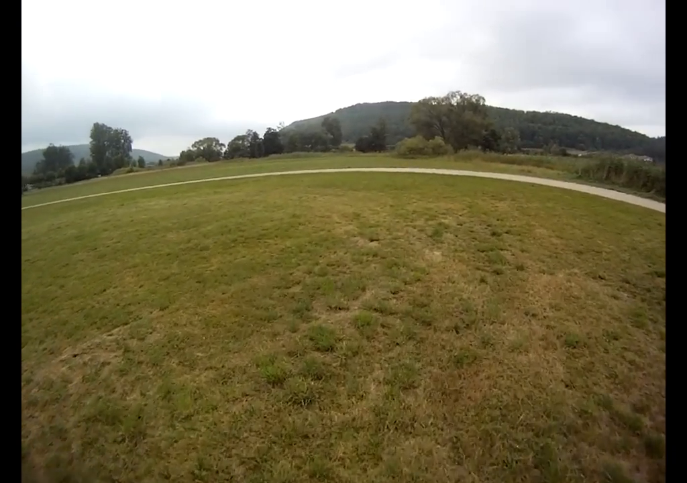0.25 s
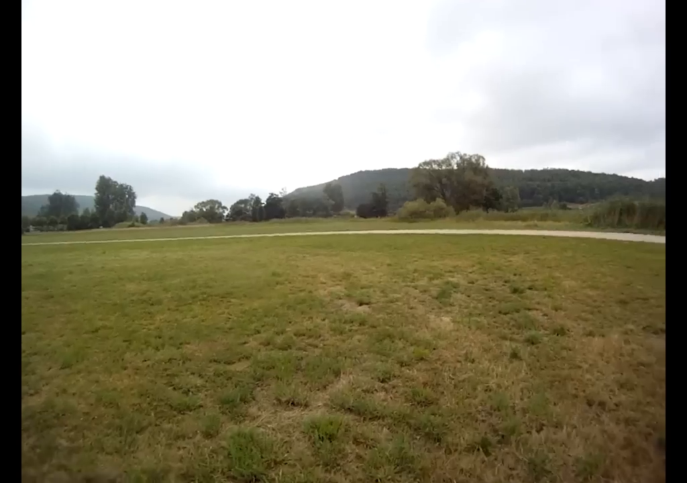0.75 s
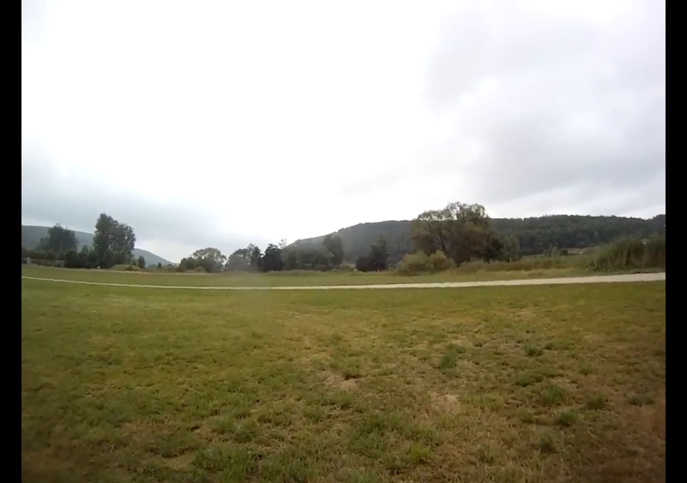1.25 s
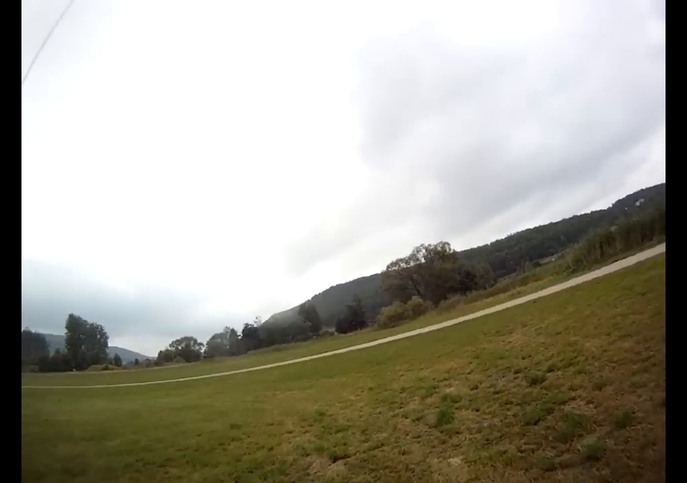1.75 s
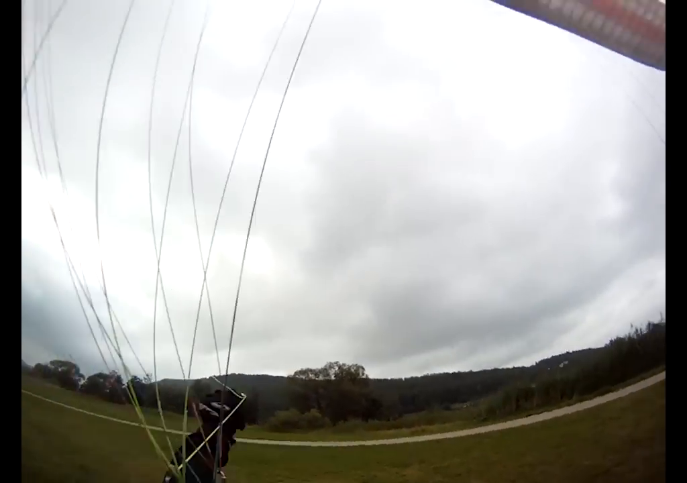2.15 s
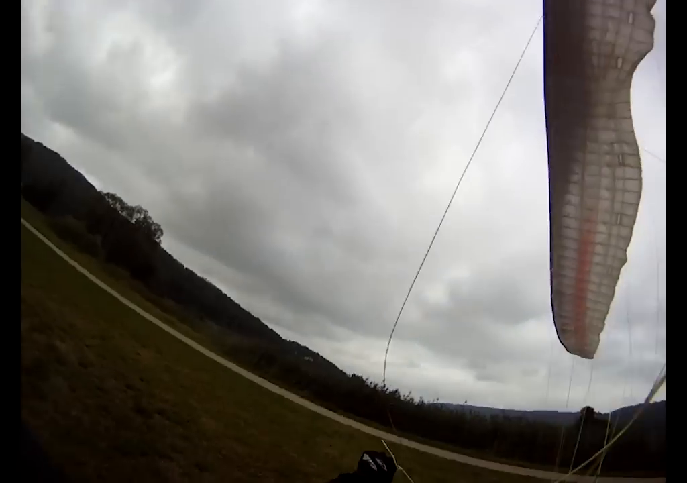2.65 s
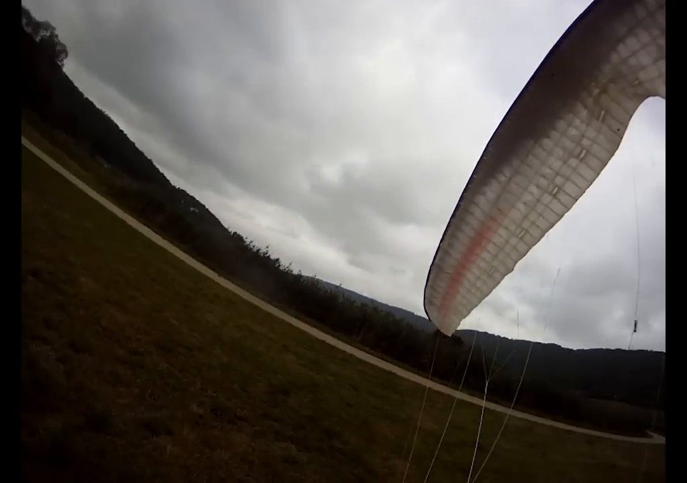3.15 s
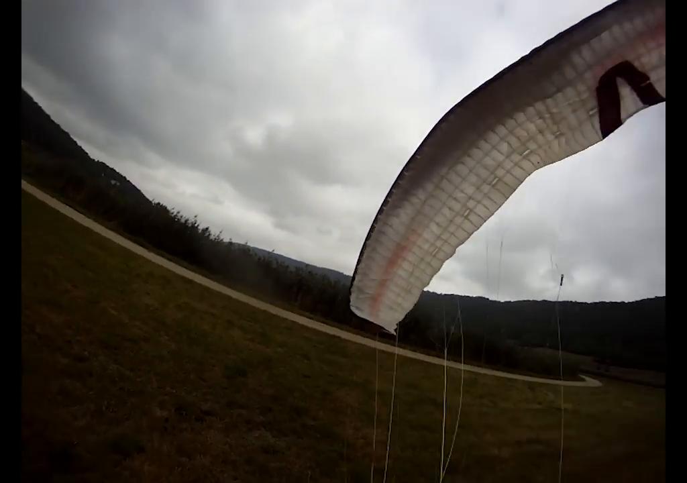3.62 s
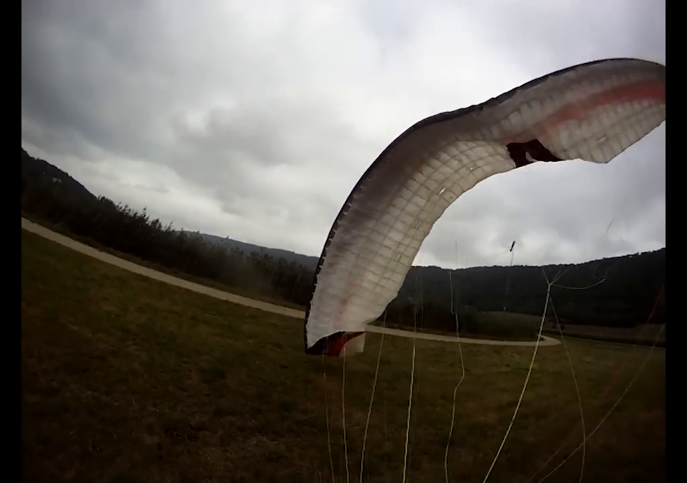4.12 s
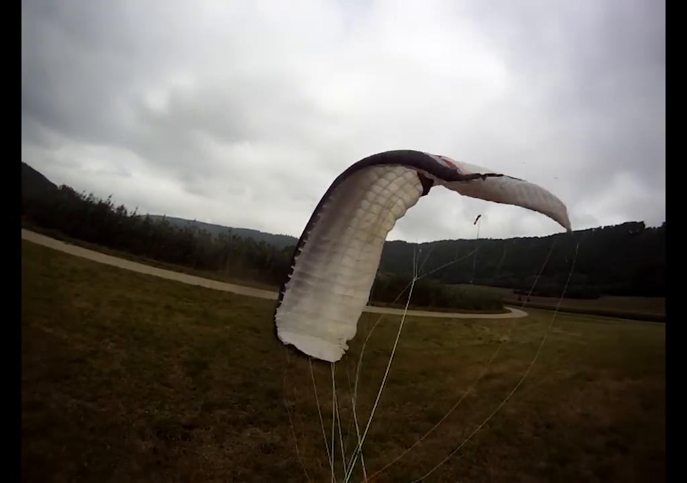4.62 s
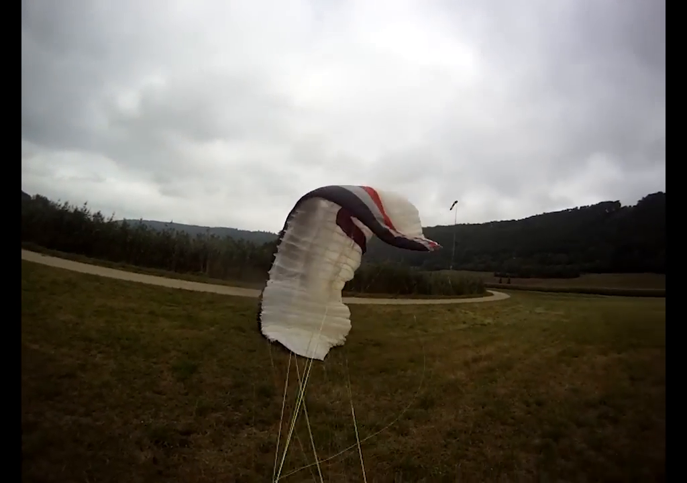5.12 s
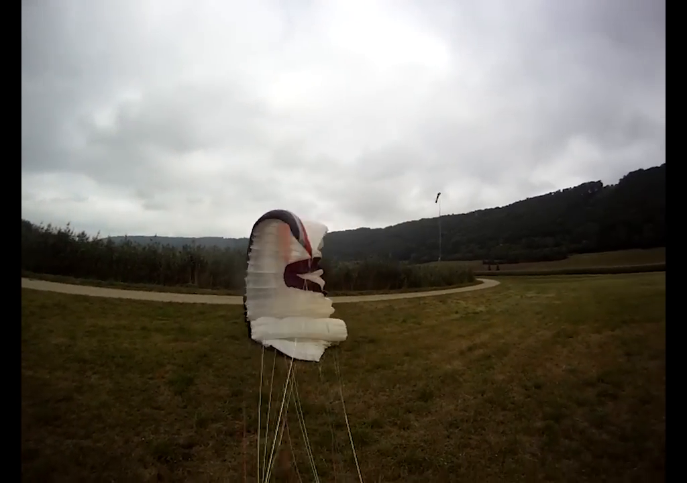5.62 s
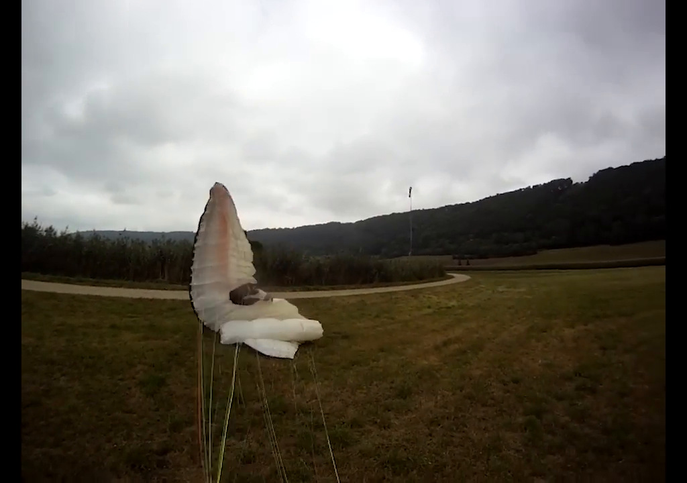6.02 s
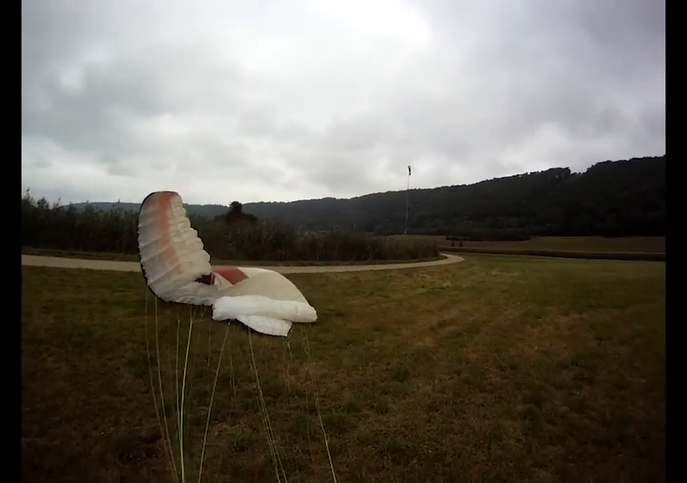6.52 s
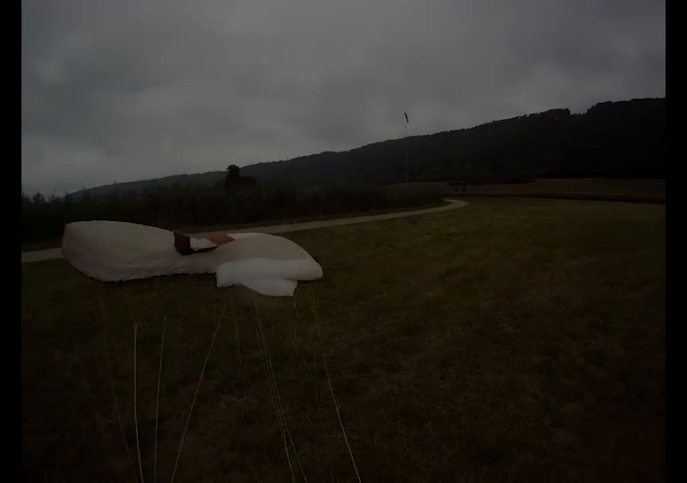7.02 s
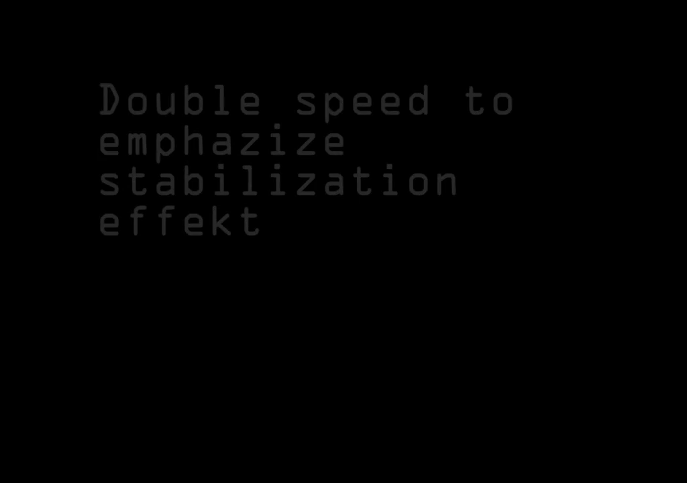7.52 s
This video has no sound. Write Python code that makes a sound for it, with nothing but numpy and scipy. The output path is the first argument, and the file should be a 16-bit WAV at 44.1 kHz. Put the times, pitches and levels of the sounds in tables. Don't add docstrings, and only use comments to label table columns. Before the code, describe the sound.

On an open field, a helmet microphone catches strong low wind buffeting. A very loud cluster of harness thumps and plastic buckle knocks hits, and the wind drops. A braided cord is then hauled through a metal ring, buzzing and zipping up and down in pitch. It slackens to faint scratches; stiff fabric rustles, with a last scratchy drag before sudden silence.

```python
import sys
import numpy as np
from scipy import signal
from scipy.fft import rfft, irfft, next_fast_len
from scipy.io import wavfile
from scipy.ndimage import uniform_filter1d, map_coordinates

SR = 44100
rng = np.random.default_rng(int(sys.argv[2]) if len(sys.argv) > 2 else 0)


def waveform_to_disk(signal):
    frames = np.transpose(np.atleast_2d(signal))
    scaled = np.clip(frames, -1, 1) * 32767
    samples = np.round(scaled).astype(np.int16)
    wavfile.write(sys.argv[1], SR, samples)


def undo_db(level):
    steps = np.asarray(level, float) / 20
    return 10 ** steps


N = 342416
TIME = np.arange(N) / SR
SPARSE = TIME[::16]
HOLD_HZ = 12000


def unit(x):
    return x / np.sqrt(np.mean(x ** 2) + 1e-20)


def curves(rows):
    s, *cols = np.transpose(rows)
    return [np.interp(TIME, s, c) for c in cols]


def wobble(rate):
    coarse = np.arange(N // 16 + 2) * 16 / SR
    knots = rng.standard_normal(int(N * rate / SR) + 4)
    return np.interp(TIME, coarse, map_coordinates(knots, [coarse * rate]))


def swells(rows):
    bells = sum(height * np.exp(-((SPARSE - s) / half) ** 2) for s, height, half in rows)
    return np.interp(TIME, SPARSE, bells)


def filtered(x, response):
    m = next_fast_len(N + SR // 2)
    return irfft(rfft(x, m) * response(np.fft.rfftfreq(m, 1 / SR)), m)[..., :N]


def colour(spectrum):
    def response(hz):
        f, db = np.transpose(spectrum)
        gain_db = np.interp(np.log(hz + 1), np.log(f), db)
        cepstrum = irfft(np.log(undo_db(gain_db) + 1e-5))
        cepstrum[1:len(hz) - 1] *= 2
        cepstrum[len(hz):] = 0
        return np.exp(rfft(cepstrum))
    return response


def resonances(modes):
    return lambda f: sum(undo_db(db) * 1j * f * w / (c * c - f * f + 1j * f * w) for c, w, db in modes)


def noise(spectrum, patchy_db):
    z = signal.stft(rng.standard_normal(N + 512), nperseg=512)[2]
    field = uniform_filter1d(rng.standard_normal(z.shape), size=5, axis=0)
    field = unit(uniform_filter1d(field, size=6, axis=1))
    patchy = signal.istft(z * undo_db(patchy_db * field), nperseg=512)[1][:N]
    return unit(filtered(patchy, colour(spectrum)))


# pitch_hz, level_db (per Hz)
BUFFET_COLOUR = [(12, -18), (20, -1), (49, -1), (76, 0), (95, -2.5), (120, -36), (210, -120)]
# pitch_hz, level_db (per Hz)
FLUTTER_COLOUR = [(53, -31.5), (90, 1.5), (113, -0.5), (200, -7.5), (260, -24), (440, -120)]
# pitch_hz, level_db (per Hz)
RUSH_COLOUR = [(120, -28.5), (200, -3.5), (318, -2), (390, -4), (513, -2), (759, -16.5), (1000, -27.5),
               (1300, -25.5), (2200, -120)]
# time_s, strength_db
AIRFLOW = [(0, -37), (.14, -33), (.53, -29.5), (.79, -29), (.88, -41), (1.26, -38.5), (1.4, -45.5),
           (2.2, -42), (2.9, -46.5), (3.4, -44.5), (4.2, -46.5), (4.7, -47.5), (5.4, -45.5), (6.4, -47.5),
           (7.4, -48.5)]
# middle_s, swell_db, half_length_s, rush_share (part of the swell heard in the rush)
GUSTS = [(0.067, 14, 0.29, 0.042), (0.785, 5, 0.037, 2.1), (0.834, 1.5, 0.16, 1.1),
         (1.106, 3.5, 0.72, 1.76), (1.485, 4.5, 0.072, 1.5), (2.157, 4.5, 0.17, 0.98),
         (2.47, 4, 0.053, 0.75), (2.653, 4, 0.077, 0.53), (2.831, 0.5, 0.045, 1.6), (3.38, 3, 0.048, 2.16),
         (3.597, 3.5, 0.16, 0.82), (4.371, 0.5, 0.11, 1.24), (4.597, 6, 0.22, 1.46), (4.68, 3, 0.59, 0.76),
         (4.753, 6, 0.06, 0.29), (4.913, 8, 0.043, 1.3), (5.063, 7, 0.059, 0.6), (5.178, 3, 0.19, 1.4),
         (5.744, 1, 0.69, 0.74), (6.078, 7.5, 0.14, 0.35), (6.541, 2.5, 0.068, .1),
         (6.911, 5.5, 0.11, 0.19), (7.237, 5.5, .12, 1)]
CALM_DB, FLUTTER_DB, RUSH_DB = -44, -51.5, -50.5
FLUTTER_FOLLOWS, RUSH_FOLLOWS, BUFFET_SWELLS = 0.33, 0.31, 0.16


def wind():
    air_db, = curves(AIRFLOW)
    gust_db = swells([row[:3] for row in GUSTS])
    rush_gust_db = swells([(s, db * share, half) for s, db, half, share in GUSTS])
    buffet_db = air_db + BUFFET_SWELLS * gust_db
    flutter_db = FLUTTER_DB + FLUTTER_FOLLOWS * (air_db - CALM_DB) + gust_db
    rush_db = RUSH_DB + RUSH_FOLLOWS * (air_db - CALM_DB) + rush_gust_db
    lumps = wobble(4.6)
    buffet = unit(undo_db(0.5 * lumps) * noise(BUFFET_COLOUR, patchy_db=1))
    rush = unit(undo_db(0.5 * lumps + 0.69 * wobble(25)) * noise(RUSH_COLOUR, patchy_db=2.5))
    flutter = noise(FLUTTER_COLOUR, patchy_db=2.0)
    return undo_db(buffet_db) * buffet + undo_db(flutter_db) * flutter + undo_db(rush_db) * rush


# time_s, level_db
FABRIC = [(0, -57), (.36, -55), (.58, -47), (1.1, -50), (1.3, -46.5), (1.53, -50), (2.6, -50.5),
          (2.7, -55.5), (2.78, -48), (4.25, -48.5), (4.4, -45), (4.9, -40), (5.2, -44.5), (5.44, -50),
          (5.93, -48), (6.5, -54), (7.41, -53), (7.455, -48.5)]
# pitch_hz, level_db (per Hz)
CLOTH_COLOUR = [(350, -27.5), (600, 0), (815, -7), (977, -4.5), (1070, -6), (1790, -8.5), (2180, -4.5),
                (3020, -4), (3620, -13.5), (4830, -12.5), (5620, -21.5), (5900, -15), (7670, -54),
                (13000, -120)]
# middle_s, swell_db
FLAPS = [(.265, 1.5), (.88, 2.5), (1.075, -2), (4.78, 0), (4.82, -8), (4.955, -2), (5.01, -4.5), (5.052, 4),
         (5.25, 2), (5.31, 2), (5.77, 0.5), (5.93, 2.5), (7.327, 4.5)]
FLAP_S = 0.013
BIGGEST_CREASE_DB = 6


def fabric():
    level_db, = curves(FABRIC)
    level_db = level_db + swells([(s, db, FLAP_S) for s, db in FLAPS])
    creases = rng.random(N) < 700 * undo_db(5 * wobble(18)) / SR
    crease_db = np.minimum(2.2 * rng.exponential(size=N), BIGGEST_CREASE_DB)
    grains = creases * np.clip(rng.standard_normal(N), -2, 2) * undo_db(crease_db)
    crackle = unit(filtered(grains, colour(CLOTH_COLOUR)))
    hiss_db = 0.7 * wobble(23) + 0.75 * wobble(45)
    hiss = unit(undo_db(hiss_db) * noise(CLOTH_COLOUR, patchy_db=1.6))
    return undo_db(level_db + 1.0) * (hiss + undo_db(-8.0) * crackle)


# middle_s, level_db, pitch_hz, length_s
RUBS = [
    (0.253, -47.5, 2700, 0.016),
    (0.286, -44.5, 2740, 0.029),
    (0.349, -50, 2570, 0.077),
    (0.424, -48, 2130, 0.035),
    (0.54, -51, 2840, 0.023),
    (0.729, -37.5, 2400, 0.067),
    (1.062, -40.5, 2100, 0.059),
    (1.065, -48.5, 3280, 0.086),
    (1.46, -49, 5370, 0.03),
    (5.948, -48, 2590, 0.055),
]


def rubs():
    out = np.zeros(N)
    t = TIME[:SR // 5] - 0.1
    for s, db, hz, length in RUBS:
        stroke = signal.lfilter(*signal.iirpeak(hz, 6.5, fs=SR), rng.standard_normal(len(t)))
        swell = np.exp(-(2 * t / length) ** 4)
        out[round((s + t[0]) * SR):][:len(t)] += undo_db(db) * unit(stroke) * swell
    return out


# pitch_hz, width_hz, level_db
RING = [(595, 56, -2), (1090, 191, 3), (1483, 330, -11.5), (2110, 248, 4), (2480, 80, 1), (2700, 100, -2.5),
        (3007, 84, -3.5), (3140, 77, -25.5), (3720, 38, -15.5), (4165, 75, -6.5), (4910, 150, -8),
        (5800, 440, -27)]


def blips(events, cycles, crack):
    out, cracks = np.zeros(N + SR), np.zeros(N + SR)
    t = TIME[:SR // 10]
    for s, db, hz in events:
        start = round(s * SR)
        ring = np.sin(2 * np.pi * hz * t) * np.exp(-t * hz / cycles) * (1 - np.exp(-t * hz / 0.6))
        snap = rng.standard_normal(len(t)) * np.exp(-t / 0.0026) * (1 - np.exp(-t / 0.00063))
        out[start:][:len(t)] += undo_db(db) * ring
        cracks[start:][:len(t)] += undo_db(db) * crack * snap
    return out[:N] + filtered(cracks[:N], resonances(RING))


# start_s, peak_db, pitch_hz
THUMPS = [(0.56, -49, 140), (0.6185, -18, 449.5), (0.622, -23.5, 178), (0.63, -20, 381), (0.655, -20, 140),
          (0.686, -7, 349), (0.756, -25, 102.3), (0.786, -9.5, 96.2), (0.794, -19.5, 194.4),
          (0.783, -15.5, 328), (0.79, -16.5, 420), (0.814, -35, 102.3), (1.427, -18.5, 369),
          (1.547, -30.5, 601), (4.896, -23, 107)]


def harness_bumps():
    return blips(THUMPS, cycles=0.69, crack=0.069)


TICK_CYCLES = 3
# start_s, peak_db, pitch_hz
TICKS = [(0.799, -27.5, 2130), (0.817, -39, 830), (0.829, -29, 2060), (0.84, -34, 2160), (0.881, -25, 2130),
         (0.946, -39, 2300), (0.993, -24, 2150), (1.262, -33.5, 2050), (1.276, -27, 1100),
         (1.277, -24.5, 2070), (1.303, -23.5, 2080), (1.31, -23, 1030), (1.314, -23.5, 640),
         (1.545, -34, 2170), (1.547, -26, 660), (3.669, -37.5, 2019), (4.417, -28.5, 2150),
         (4.8157, -20.5, 2870), (4.818, -25, 2800), (4.84, -44, 2110), (4.899, -32, 870),
         (4.994, -26, 2228), (6.579, -27, 2150), (6.779, -39, 3100), (6.927, -28, 3524), (7.098, -26, 2902),
         (7.129, -27, 2230)]


def ticks():
    return blips(TICKS, cycles=TICK_CYCLES, crack=1.1)


# start_s, peak_db, pitch_hz
CATCHES = [(0.6165, -15, 525), (0.6485, -9.5, 900), (0.651, -13.5, 600), (0.6995, -13.5, 522),
           (3.846, -27, 3200), (3.846, -35, 1154), (3.92, -31, 4995), (4.021, -24, 4300),
           (4.0841, -26, 2193), (4.1265, -28, 3146), (4.1934, -27, 2080), (4.212, -32, 4940),
           (4.59, -26, 3600), (4.605, -29, 2290), (4.7398, -31, 3060), (4.7663, -28, 2540),
           (4.8401, -32, 2700), (4.8725, -44, 894), (5.0421, -30, 2190), (6.582, -27, 1147),
           (6.722, -24, 3100), (6.768, -31, 3000), (6.777, -26, 2900), (6.8056, -25, 2199),
           (6.9683, -24, 2250), (7.0431, -28, 2050), (7.134, -29, 1150), (7.135, -24, 2916),
           (7.178, -26, 2602), (7.2162, -28, 2713), (7.2411, -26, 2028)]


def snags():
    return blips(CATCHES, cycles=TICK_CYCLES, crack=0.6)


# start_s, peak_db, t60_s, corner_hz (hardness)
KNOCKS = [(0.598, -15, 0.012, 1800), (0.6122, 2, 0.02, 1300), (0.6149, -2.5, 0.011, 3990),
          (0.63, -17.5, 0.029, 1500), (0.6419, -6, 0.011, 1000), (0.642, 5.5, 0.0078, 1804),
          (0.6438, 2.5, 0.009, 9000), (0.6479, 2, 0.012, 2804), (0.6777, -15, 0.012, 3960),
          (0.6832, -9.5, 0.016, 3000), (0.6944, -9.5, 0.0068, 797), (0.6977, 10, 0.0085, 2620),
          (0.7229, -11.5, 0.015, 2000)]
# pitch_hz, width_hz, level_db
CASE = [
    (620, 380, -1),
    (1000, 510, 5.5),
    (1350, 510, -15),
    (2100, 550, 0),
    (3200, 700, -4.5),
    (4700, 600, -27),
]


def buckle():
    blows = np.zeros(N + SR)
    t = TIME[:SR // 20]
    for s, db, t60, hz in KNOCKS:
        blow = 0.59 * rng.standard_normal(len(t)) * undo_db(-60 * t / t60) * (1 - np.exp(-t / 0.0011))
        blow[:8] -= 0.5 * np.hanning(8)
        soft = np.exp(-2 * np.pi * hz / SR)
        dulled = signal.lfilter([(1 - soft) ** 2], np.poly([soft, soft]), blow)
        blows[round(s * SR):][:len(t)] += undo_db(db + 11.0) * dulled
    return filtered(blows[:N], resonances(CASE))


# time_s, ridge_rate_hz, tilt_db (of the flick, per overtone), twin_db (bump between ridges)
HAULS = [
    [(1.548, 298.4, -13.5, 21.5), (1.645, 374.3, -8.5, -2), (1.715, 503, 3.5, -8), (1.745, 507.6, 2.5, 0),
     (1.82, 696, 3, 7.5), (1.85, 702, 3.5, -7)],
    [(1.87, 795, 5, 8), (1.89, 826.6, 4, 11.5), (2.013, 844.4, 3.5, 3), (2.118, 957.5, 1, 2.5),
     (2.205, 955, -0.3, -2.5), (2.244, 722, 2, 0), (2.29, 689, -7.5, 5), (2.325, 553.7, 1, 7)],
    [(2.353, 540.3, -6, 6.5), (2.42, 430, -0.5, 4), (2.49, 380, 2, 0.5), (2.565, 331, 1, 2),
     (2.678, 301.8, 12, .3)],
    [(2.825, 314.4, 10, -10.5), (2.926, 333.6, 11, 0), (3.04, 369.2, 2.5, -2), (3.098, 525, -3, -1.5),
     (3.185, 424, 5.5, -3), (3.27, 478.5, 1.5, -7), (3.325, 455.2, 0, -11), (3.372, 400, 1, -7)],
    [(3.42, 454.2, -2.5, -12), (3.485, 383.4, 2.5, -4), (3.555, 389, -0.5, -12), (3.575, 305, 1, 10),
     (3.64, 296.5, 6.5, 6), (3.75, 341, 0.5, -6)],
]
# middle_s, top_rate_hz, half_length_s
JERKS = [(1.694, 611.6, 0.027), (1.734, 537, 0.011), (1.78, 888.5, 0.041), (1.834, 721, 0.011),
         (1.914, 846, .014), (1.967, 1011, 0.032), (2.073, 1212, 0.044), (2.13, 986, 0.01),
         (2.177, 1007, 0.013), (2.38, 642, 0.031), (2.522, 489.7, 0.033), (2.897, 388.5, .025),
         (2.951, 424.6, .022), (2.982, 501.6, 0.038), (3.075, 602.2, .03), (3.128, 691, .048),
         (3.21, 600.5, .028), (3.254, 539, .018), (3.299, 522.5, 0.024), (3.344, 521.3, .022),
         (3.398, 500.8, .025), (3.534, 488.3, 0.026), (3.702, 435.5, 0.042)]
ROUND_TOP = 1.5
LOUDER_DB_PER_OCTAVE, MIDDLE_HZ = 7, 630
SLIP_DB_PER_OCTAVE = 5


def speed():
    pull, tilt_db, twin_db = curves(np.concatenate(HAULS))
    arches = []
    for s, hz, half in JERKS:
        arch = np.clip(1 - np.abs((SPARSE - s) / half) ** ROUND_TOP, 0, 1)
        arches.append((hz - pull[round(s * SR)]) * arch)
    slips = np.interp(TIME, SPARSE, np.max(arches, axis=0))
    tugged = np.exp(uniform_filter1d(np.log(pull + slips), size=220))
    effort_db = LOUDER_DB_PER_OCTAVE * np.log2(pull / MIDDLE_HZ)
    effort_db = effort_db + SLIP_DB_PER_OCTAVE * np.log2(tugged / pull)
    return tugged, effort_db, [-tilt_db, twin_db, tilt_db]


# start_s, end_s, first_db, last_db, treble_db (a tighter cord scratches brighter)
SLIDES = [(1.576, 1.686, -31, -28.5, -12.5), (1.672, 1.864, -25, -24, -4), (1.858, 1.98, -27.5, -24, 3),
          (1.981, 2.081, -26, -25, 0.5), (2.086, 2.143, -29, -29.5, -2), (2.152, 2.231, -30, -28, 1),
          (2.252, 2.39, -28.5, -25.5, -1.5), (2.397, 2.446, -24, -34.5, -2), (2.501, 2.56, -30, -32, -10.5),
          (2.549, 2.588, -26, -35.5, -5), (2.797, 2.828, -43, -32, 2), (2.859, 2.903, -32.5, -28, 7),
          (2.898, 3.043, -29.5, -29, 7), (3.046, 3.141, -28.5, -27, 1), (3.147, 3.235, -31, -26, 0.5),
          (3.232, 3.348, -27, -26, 0.5), (3.36, 3.505, -28, -28.5, -2.5), (3.509, 3.632, -26.5, -29, 1.5),
          (3.664, 3.698, -37.5, -27, 3.5), (3.704, 3.753, -25.5, -33.5, 1)]
# start_s, end_s, first_db, last_db, treble_db
CREEPS = [(3.806, 3.846, -48, -33, -6), (3.84, 3.89, -46, -45, -8), (3.895, 4.005, -52.5, -38.5, -9),
          (4.012, 4.095, -39, -44, -9), (4.109, 4.135, -43, -42, -7), (4.14, 4.18, -47, -50, -14),
          (4.187, 4.219, -41, -51, -6), (6.556, 6.591, -38.5, -35.5, 4), (6.598, 6.66, -40, -56, -8),
          (6.673, 6.736, -48, -37.5, 7), (6.74, 6.769, -40.5, -44, 10), (6.778, 6.822, -35.5, -39.5, 4),
          (6.832, 6.877, -39, -37, 5), (6.872, 6.952, -36.5, -41, 2), (6.952, 6.992, -37.5, -37.5, -3),
          (7.013, 7.079, -38.5, -39, 3), (7.083, 7.125, -35, -30, 6.5), (7.134, 7.151, -30, -39.5, -1),
          (7.156, 7.183, -39, -44, 2), (7.191, 7.281, -44, -36, 4.5)]
ATTACK_DB_PER_S, RELEASE_DB_PER_S = 802, 600


def pressure():
    levels = []
    for a, b, first_db, last_db, _ in SLIDES + CREEPS:
        slope = np.interp(SPARSE, [a, b], [first_db, last_db])
        rise = ATTACK_DB_PER_S * np.maximum(a - SPARSE, 0)
        release = RELEASE_DB_PER_S * np.maximum(SPARSE - b, 0)
        levels.append(slope - rise - release)
    return np.interp(TIME, SPARSE, np.max(levels, axis=0))


CREEP_S, STRAP_S = 3.78, 6.5
CREEP_HZ = 234
OVERTONES_DB = [-0.5, 2.4, 3.5, 3.5, 1]
# time_s, bite_db (fourth overtone and up), judder (of the speed, 0-1), scrape_db, fourth_db (extra)
EDGE = [(1.6, 4, 0, 0, -3.5), (1.78, 1.5, 0.02, -5, 2), (1.95, -2, 0.02, -7, 2), (2.08, -1, 0.04, -2, 0.5),
        (2.14, 5, 0.02, 1, 1), (2.2, -3.5, 0.03, -2, -1), (2.27, 13, 0.02, 4.5, -1),
        (2.34, 7.5, 0.015, 2.5, -3), (2.4, 2.5, 0, 5, 1), (2.55, -5, 0.05, 3.5, -4.5),
        (2.87, 1.5, 0.02, 0, 12), (3, -5, 0.01, -1, 6), (3.07, -4.5, 0.05, 0, 8), (3.13, -4, 0, 1, -1),
        (3.21, -1, 0.06, 1.5, 2), (3.45, -0.5, 0.02, 0.5, 0), (3.6, 4, 0.01, 2, 3),
        (3.75, 4.5, 0.01, 3, 3.5)]
FLICKER_DB = 2.8
STICK_HZ, STICK_LAW, MOST_SCRAPE = 240, 1.45, 0.8
CATCH_DB, CATCH_HZ = 1, 140
# pitch_hz, level_db
FUZZ = [(400, -1), (1100, -2.5), (1800, 2.5), (2500, 0), (4000, 9), (5500, 1.5)]
# pitch_hz, width_hz, level_db
SLACK = [(630, 300, -6), (1100, 540, -4)]
# pitch_hz, width_hz, level_db
CREEP_RING = [(1098, 610, 9.5), (2130, 160, -10), (3100, 390, -6), (5040, 383, 6.5)]
# pitch_hz, width_hz, level_db
STRAP_RING = [(2150, 260, 2.5), (3217, 296, -6), (3805, 190, 8)]
# pitch_hz, level_db
STRAP = [(500, 7), (800, 9.5), (1080, 11), (1400, 8), (1750, 5), (2150, -2.5), (3000, -1), (4000, -20.5),
         (5500, -12)]


def cord():
    creeping = TIME > CREEP_S
    tugged, effort_db, seat_db = speed()
    rate = np.where(creeping, CREEP_HZ * undo_db(1.4 * wobble(17)), tugged)
    bite_db, judder, scrape_db, fourth_db = curves(EDGE)
    juddered = rate * (1 + np.clip(judder, 0, 0.014) * wobble(110))
    turns = np.cumsum(juddered) / SR + 0.006 * wobble(500)

    overtone_db = np.array(OVERTONES_DB + [-2.5] * 5 + [-4.5] * 6)[:, None]
    shape_db = overtone_db + np.array(seat_db + [bite_db + fourth_db] + [bite_db] * 12)
    flicks = np.zeros(N)
    for k, db in enumerate(shape_db, start=1):
        level = undo_db(db + FLICKER_DB * wobble(105))
        flicks += level * np.cos(2 * np.pi * k * turns + k * k) * (k * rate < HOLD_HZ / 2)

    scrape = rng.standard_normal(N) * undo_db(5 * np.cos(2 * np.pi * turns))
    sticking = uniform_filter1d((STICK_HZ / rate) ** STICK_LAW, size=3000)
    share = np.clip(sticking * undo_db(scrape_db), 0, MOST_SCRAPE)
    share[creeping] = 0.94
    rub = np.sqrt(1 - share) * unit(flicks) + np.sqrt(share) * unit(filtered(scrape, colour(FUZZ)))

    damped = resonances(SLACK + RING[2:])
    hauled = filtered(rub, resonances(RING))
    crept = filtered(rub, lambda f: damped(f) * (1 + resonances(CREEP_RING)(f)))
    padded = filtered(rub, lambda f: damped(f) * colour(STRAP)(f) * (1 + resonances(STRAP_RING)(f)))
    drag = np.where(TIME > STRAP_S, padded, np.where(creeping, crept, hauled))
    thin = filtered(drag, lambda f: 1 - 0.65 / (1 + (f / 1600) ** 8))
    drag = np.where(creeping, thin, drag)

    treble = filtered(drag, lambda f: 1 / (1 + (3700 / (f + 1)) ** 8))
    treble_db, = curves([((a + b) / 2, db) for a, b, *_, db in SLIDES + CREEPS])
    drag += (undo_db(treble_db) - 1) * treble
    drag /= np.sqrt(np.abs(uniform_filter1d(drag ** 2, size=1500)))
    catch_db = CATCH_DB * wobble(CATCH_HZ) - 0.6
    level_db = pressure() + np.where(TIME < CREEP_S, effort_db, catch_db)
    return drag * undo_db(level_db + 0.14 * wobble(62) + 0.96 * wobble(170))


def scene():
    background = wind() + fabric() + rubs()
    small = harness_bumps() + ticks() + snags()
    return (background + small + buckle() + cord())[None]


def band_limit(x):
    return signal.sosfilt(signal.butter(12, 11600, fs=SR, output="sos"), x)


CUT_S = 7.464
DUCK, DUCK_FROM, DUCK_S = 8.4, 0.31, 0.039


def record(dry):
    narrow = filtered(dry, lambda hz: np.clip((5950 - hz) / 600, 0, 1) ** 0.87
                      / np.sinc(np.minimum(hz / HOLD_HZ, 0.5)))
    images = narrow * (1 + 2 * np.cos(2 * np.pi * HOLD_HZ * TIME))
    held = filtered(images, lambda hz: np.sinc(hz / HOLD_HZ) * (hz < 16000))
    kept = np.exp(-1 / (DUCK_S * SR))
    over = signal.lfilter([1 - kept], [1, -kept], np.maximum(np.abs(held) - DUCK_FROM, 0))
    held = held / (1 + DUCK * np.roll(over, SR // 150, axis=1))
    clipped = held / (1 + np.abs(held) ** 8) ** (1 / 8)
    settling = undo_db(-81.5) * np.exp(-np.abs(TIME - CUT_S) / 0.04)
    mix = np.where(TIME < CUT_S, clipped, settling)
    return band_limit(mix)


dry = scene()
out = record(dry)
waveform_to_disk(out)
```